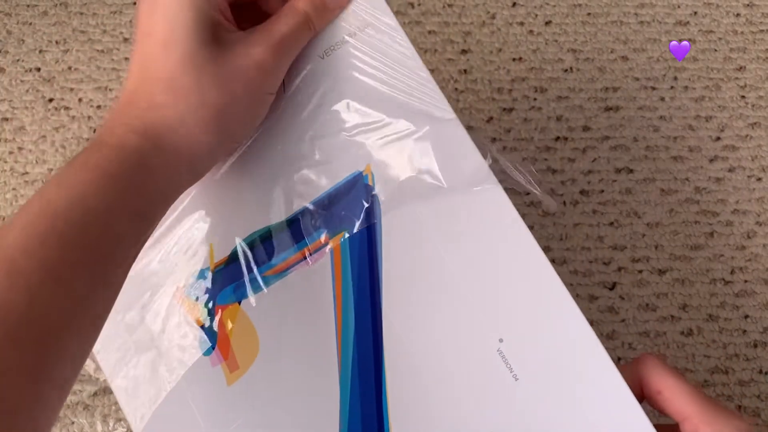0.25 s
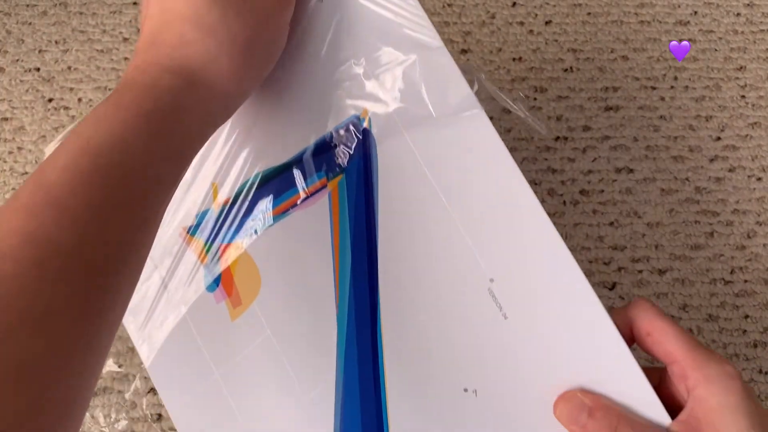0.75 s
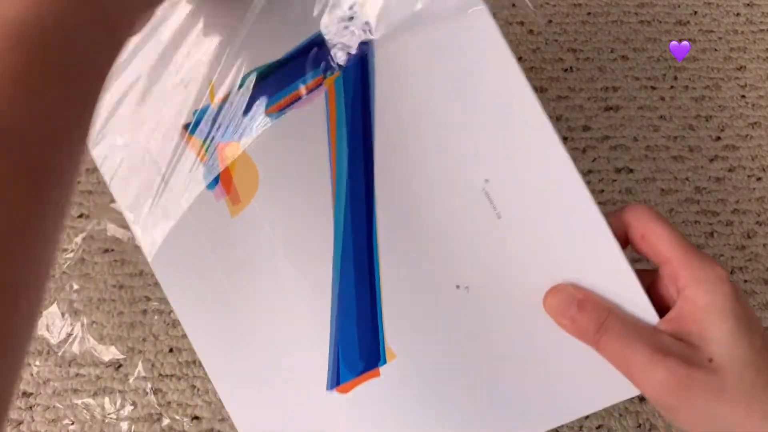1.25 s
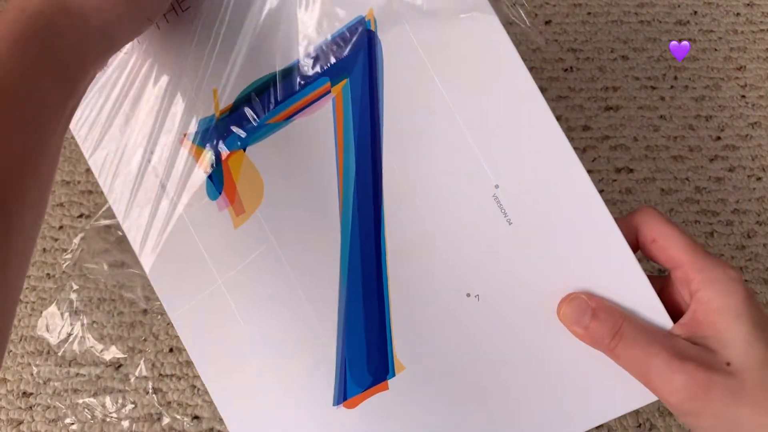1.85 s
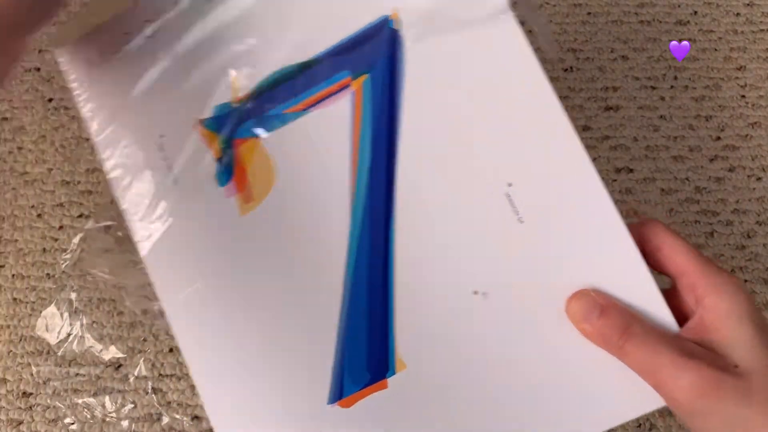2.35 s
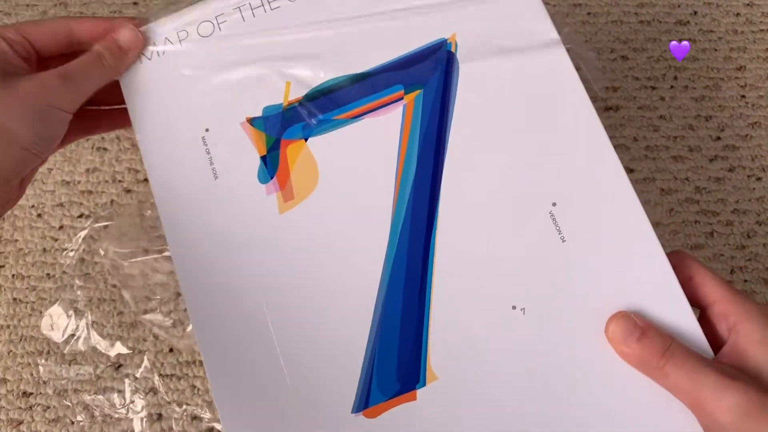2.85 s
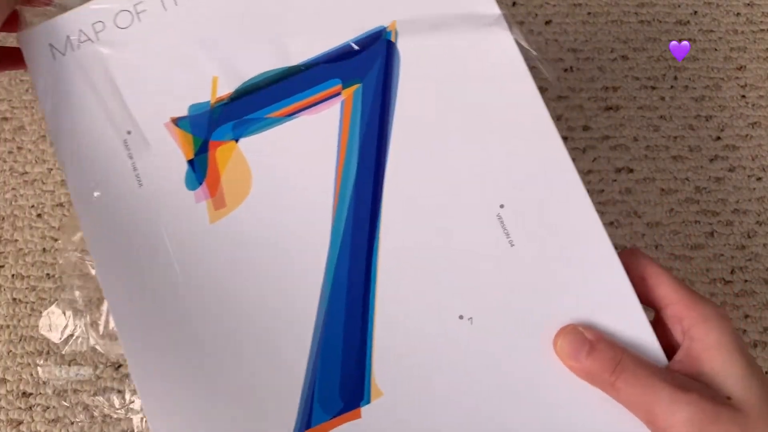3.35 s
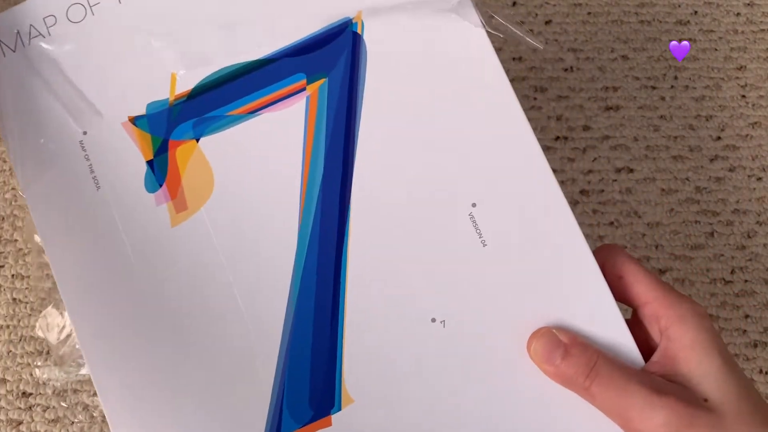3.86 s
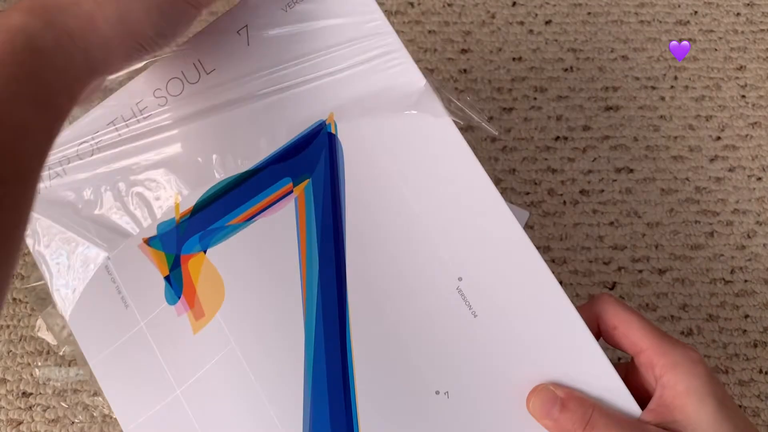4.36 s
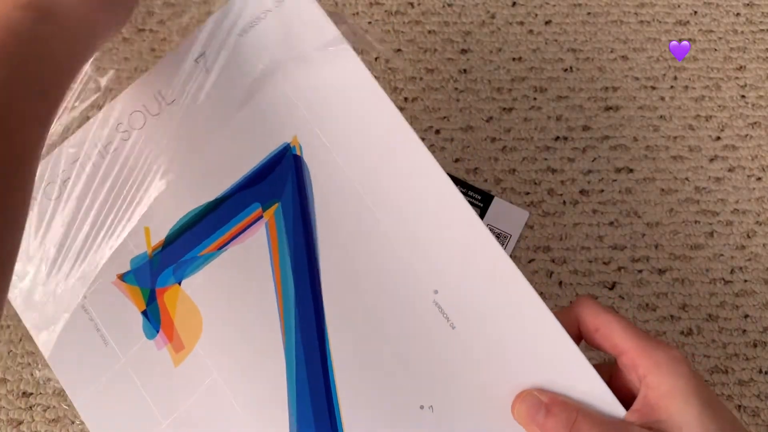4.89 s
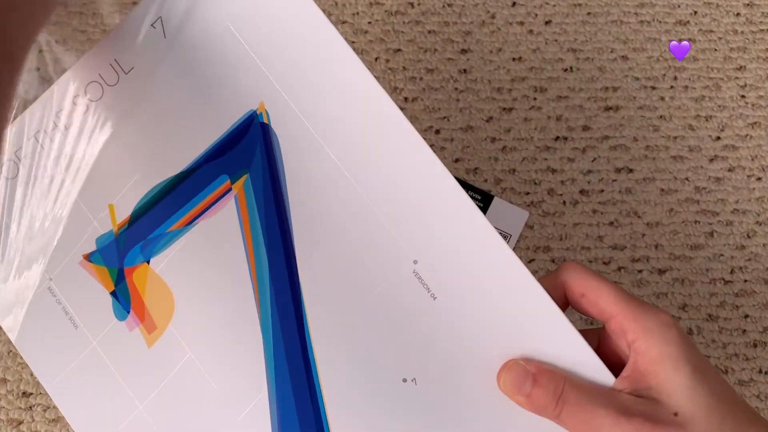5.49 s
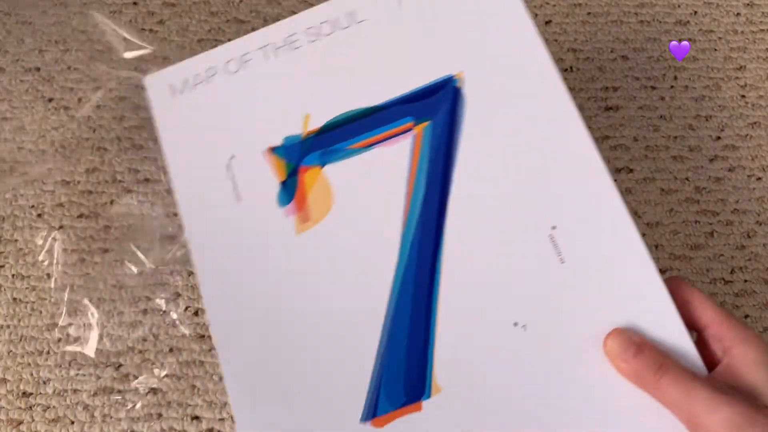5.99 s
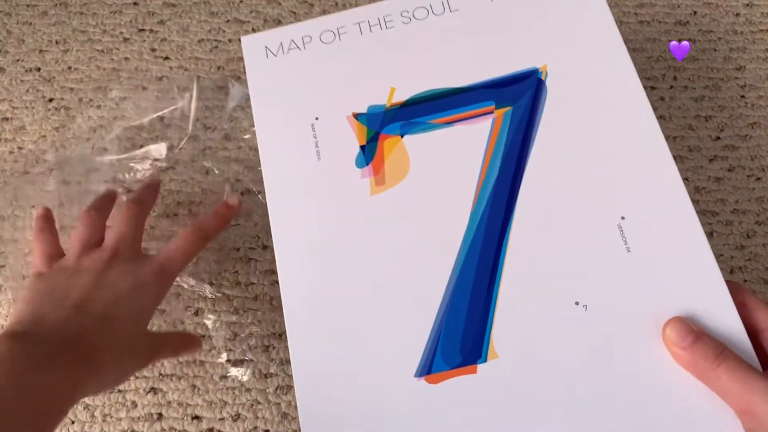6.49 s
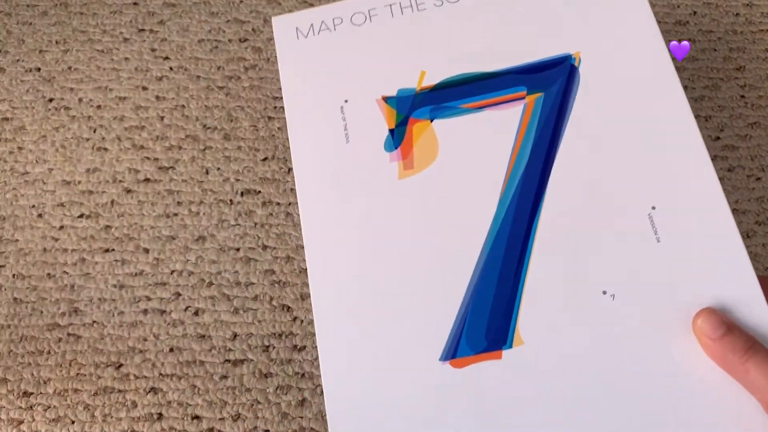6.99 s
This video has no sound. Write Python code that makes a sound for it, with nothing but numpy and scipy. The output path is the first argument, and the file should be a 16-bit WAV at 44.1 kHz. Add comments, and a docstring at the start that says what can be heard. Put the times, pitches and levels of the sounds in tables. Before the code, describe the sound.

Crisp crinkling of shrink wrap in uneven pulls, each with sharp clicks, sliding folds and small hollow box thuds, separated by near-quiet gaps. A strong snap with a short thump and ringing board marks the last corner coming free. Afterwards the loose plastic rustles more finely, one swelling shove sweeps it away, and a hand brushes low and soft over carpet. Close stereo microphone, short dry indoor reflections, faint room hush.

```python
"""Peeling shrink wrap off a box

Hands peel film off a cardboard box in a small carpeted room, close to a stereo microphone.
Creases snap and crackle as short ringing clicks; sliding film and tugs ring the damped modes of the hollow box.
The stretched film leaves the last corner with a loud pop: a crack, a thump, a ringing board and a flutter.
The loose film is then swept aside over the carpet with a swish of filtered noise; the quiet room lies under it all."""
import sys
import numpy as np
from scipy import signal
from scipy.fft import rfft, irfft, next_fast_len
from scipy.io import wavfile

SR = 44100
rng = np.random.default_rng(int(sys.argv[2]) if len(sys.argv) > 2 else 0)


def materialize(psi):
    """Save the field psi as 16-bit PCM at rate SR to the path in sys.argv[1].

    A 1-D psi becomes a single channel; in a 2-D psi each row is a channel.
    """
    bounded = np.clip(np.atleast_2d(psi).T, -1, 1)
    quanta = np.round(bounded * 32767).astype(np.int16)
    wavfile.write(sys.argv[1], SR, quanta)


N = 319128
TIME = np.arange(N) / SR

# The clearest creases that snap through, each with the flap of the film around it; levels before the trims in scene():
# (time [s], crack level [dB], crack pitch [Hz], flap level [dB], flap pitch [Hz])
SNAPS = [(0.016, -29, 8500, -57, 4400), (0.03, -34, 12000, -44, 4460), (0.053, -42, 8500, -58, 3030),
         (0.0615, -45, 8000, -63, 1410), (0.07, -34.5, 7900, -45.5, 4480), (0.08, -36, 9150, -57, 3630),
         (0.101, -40, 8140, -75, 4250), (0.108, -32, 8440, -36, 4670), (0.151, -34.5, 8600, -50.5, 2230),
         (0.154, -38, 8800, -52, 1500), (0.1736, -40, 8650, -51, 1100), (0.199, -48.5, 5200, -57, 4500),
         (0.239, -32.5, 8950, -36.5, 1400), (0.241, -36.5, 8060, -58, 1400), (0.27, -48, 5000, -44.5, 615),
         (0.2792, -33.5, 10000, -48, 1500), (0.321, -38.5, 12000, -52, 4300), (0.36, -38, 11600, -47, 1520),
         (0.363, -41, 8600, -51.5, 1480), (0.472, -58, 5170, -61.5, 3400),
         (0.5140, -39.5, 10300, -49.5, 2070), (0.522, -73, 7000, -53, 1220), (0.588, -55, 9200, -56, 4720),
         (0.637, -52, 6950, -54, 2400), (0.7319, -49, 8030, -42, 780), (0.7702, -59, 3900, -53, 2840),
         (0.782, -73, 4500, -54, 2330), (0.8459, -38.5, 9500, -79, 4000), (0.868, -39, 8750, -81, 4000),
         (0.905, -38, 8250, -51, 3180), (0.913, -55, 7800, -61, 1400), (0.9654, -29.5, 7360, -39, 2880),
         (0.979, -47, 9500, -44, 3320), (1.021, -51, 5400, -51.5, 800), (1.0253, -51, 8200, -57, 1160),
         (1.044, -48, 9000, -59, 4300), (1.057, -60, 10000, -56, 2020), (1.107, -51, 10500, -48, 1580),
         (1.131, -35.5, 10750, -53, 810), (1.1569, -40, 11900, -42, 1550),
         (1.1673, -30.5, 12500, -44, 1340), (1.1957, -33, 11180, -36.5, 4380),
         (1.206, -33, 10300, -53, 3700), (1.218, -44, 9960, -59, 3020), (1.2628, -36, 9900, -52.5, 1400),
         (1.2734, -56, 9100, -42, 794), (1.3088, -40, 5890, -47, 3860), (1.323, -55, 5000, -51, 4000),
         (1.391, -49, 6500, -63, 620), (1.413, -52, 6500, -60, 620), (1.4285, -35.5, 8780, -57, 3840),
         (1.434, -34, 8240, -57, 3500), (1.519, -49, 9300, -53, 1500), (1.544, -38, 12000, -40.5, 750),
         (1.547, -40, 8300, -50, 2100), (1.563, -50, 9600, -64, 1200), (1.641, -62, 5200, -54, 1200),
         (1.662, -45, 8150, -69, 2000), (1.721, -59, 9740, -66, 696), (1.757, -56, 9580, -60, 1180),
         (1.875, -68, 4600, -52.5, 2380), (2.009, -67, 10000, -78, 4100), (2.041, -56, 10600, -61, 1200),
         (2.1, -59, 9100, -56, 1360), (2.124, -51, 10400, -55, 1500), (2.1425, -49.5, 10700, -61, 3250),
         (2.194, -67, 8000, -47, 1226), (2.202, -45, 9800, -47, 1900), (2.2204, -39, 12000, -48, 1400),
         (2.238, -33, 12000, -45, 4330), (2.2407, -28, 10600, -45.5, 800), (2.2456, -32, 12400, -37.5, 785),
         (2.25, -41, 8900, -43, 2100), (2.273, -37.5, 11000, -48.5, 4300), (2.3027, -51, 9630, -58, 3390),
         (2.3925, -67, 4670, -66, 3730), (2.441, -73, 8970, -87.5, 4000), (2.472, -54, 12000, -84, 3620),
         (2.667, -66, 8000, -67.5, 3400), (2.719, -49, 12720, -62, 2020), (2.7323, -52, 10800, -72, 3800),
         (2.747, -57, 5470, -48.5, 700), (2.753, -42.5, 9400, -60, 3280), (2.774, -33.5, 13000, -70, 4310),
         (2.825, -33.5, 12000, -63, 3990), (2.845, -48, 10500, -61, 4000),
         (2.868, -37.5, 9500, -55.5, 3760), (2.8919, -32.5, 11600, -43, 1000), (2.9, -41, 8920, -43, 2100),
         (2.946, -46, 13200, -66, 3830), (2.964, -45, 10000, -57, 3800), (2.972, -42, 10000, -58, 4260),
         (2.977, -35, 10800, -46, 3800), (2.994, -39, 10000, -51, 3500), (3.0132, -51, 9600, -47, 1190),
         (3.02, -48, 10000, -50, 1400), (3.03, -46, 6660, -51, 3400), (3.0623, -52, 9960, -44, 780),
         (3.075, -48, 8900, -35.5, 1110), (3.1033, -29, 11400, -39.5, 2350),
         (3.106, -42, 11600, -34.5, 3640), (3.1111, -39, 9900, -41, 1240), (3.16, -44.5, 10570, -57, 2400),
         (3.1779, -38, 9700, -45, 910), (3.2116, -40, 9700, -52, 3980), (3.232, -64, 9400, -52, 1200),
         (3.248, -52, 10300, -68, 3500), (3.271, -69, 7500, -58, 1190), (3.2807, -50, 13300, -71, 1000),
         (3.406, -50, 10000, -51.5, 3220), (3.431, -66, 6130, -54, 1210), (3.468, -54.5, 7000, -54, 3400),
         (3.508, -44, 12000, -57, 3470), (3.59, -64, 4500, -46, 3370), (3.6798, -36, 9500, -45.5, 3780),
         (3.733, -47.5, 4240, -45, 1495), (3.749, -66, 5000, -53, 900), (3.9057, -31, 10000, -37.5, 2100),
         (3.96, -30.5, 10300, -37, 802), (4.0492, -42.5, 7420, -57, 2100), (4.189, -63, 11000, -76, 3360),
         (4.245, -75, 7800, -66, 2900), (4.326, -53, 9300, -56, 4500), (4.3306, -43.5, 11700, -50, 1930),
         (4.361, -36, 11000, -49, 1000), (4.389, -41.5, 6570, -47, 4300), (4.413, -41, 7540, -54, 900),
         (4.4214, -39.5, 10400, -57, 1200), (4.439, -46, 10600, -59, 4500), (4.46, -38.5, 12300, -46, 1420),
         (4.471, -47, 13500, -50, 1300), (4.524, -70, 5000, -54, 1200), (4.545, -64, 11900, -53, 1200),
         (4.569, -41, 8700, -48, 1090), (4.575, -45, 9400, -53, 2070), (4.605, -40, 12900, -52, 1100),
         (4.6152, -28, 12700, -31, 1000), (4.624, -35, 8580, -32.5, 780), (4.629, -32, 12400, -33, 1250),
         (4.653, -32.5, 12200, -40.5, 1000), (4.759, -36, 10400, -42.5, 1230), (4.779, -46, 5070, -53, 620),
         (4.782, -39.5, 12460, -51, 1198), (4.805, -47, 9700, -52, 4370), (4.826, -58, 13000, -54, 1000),
         (4.8527, -38, 10600, -49.5, 2790), (4.8614, -36, 12700, -49, 790), (4.873, -52.5, 7800, -52, 4370),
         (4.916, -48, 10430, -56, 800), (4.9369, -41, 9900, -61, 2100), (4.968, -51, 9360, -51, 1000),
         (5.129, -56, 8600, -71, 1190), (5.26, -49.5, 8520, -67, 1510), (5.388, -48, 8750, -57.5, 1414),
         (5.459, -41, 11400, -60, 4500), (5.472, -35.5, 9100, -73, 4400), (5.493, -31.5, 11300, -60, 3950),
         (5.525, -43, 6000, -41, 1210), (5.542, -35, 5500, -49, 3340), (5.588, -39, 13400, -46, 2200),
         (5.6747, -36.5, 6700, -33, 2800), (5.693, -37, 6100, -44, 3430), (5.74, -48, 6000, -46, 3340),
         (5.76, -33.5, 9000, -58, 3300), (5.782, -55, 5040, -51, 4180), (5.793, -40.5, 8500, -66, 4300),
         (5.832, -47, 9100, -53, 3400), (5.865, -38, 5240, -42.5, 3270), (5.934, -51, 5200, -53, 4600),
         (6, -43, 8280, -53.5, 3320), (6.0468, -45, 6200, -74.5, 4020), (6.085, -46, 13400, -66, 4500),
         (6.105, -45, 6300, -49, 2320), (6.113, -38.5, 9600, -47, 2190), (6.119, -37, 12000, -47.5, 2320),
         (6.138, -55, 10000, -55, 3470), (6.158, -33.5, 11000, -41, 2370), (6.188, -33.5, 9600, -40, 3630),
         (6.196, -35, 9300, -52, 4400), (6.319, -50.5, 5920, -47, 1400), (6.329, -50, 5000, -46.5, 4050),
         (6.41, -54, 6000, -50.5, 3320), (6.429, -47, 10900, -49, 3600), (6.449, -41.5, 10700, -76, 3980),
         (6.5197, -43.5, 7200, -62, 3380), (6.5257, -52.5, 6000, -45.5, 3330),
         (6.574, -37.5, 9410, -52, 3400), (6.586, -35, 9400, -51, 3600), (6.615, -40.5, 4990, -36, 4180),
         (6.723, -38, 10000, -43, 4300), (6.734, -34, 12550, -49, 3800), (6.795, -41, 6800, -51, 4090),
         (6.912, -39, 10400, -63, 3734), (6.959, -44, 5900, -47, 3030), (7.161, -54, 9600, -56, 3280),
         (7.2087, -43, 13000, -56, 3970)]


def from_db(db):
    """Turn decibels into gain."""
    return 10 ** (np.asarray(db) / 20)


def rms_one(x):
    """Scale to an rms of 1."""
    return x / np.sqrt(np.mean(x ** 2) + 1e-20)


def energy_one(x):
    """Scale to a total energy of 1."""
    return x / np.sqrt(np.sum(x ** 2) + 1e-20)


def at_level(sound, db):
    """Give a short sound the energy of 2 ms at this level."""
    return energy_one(sound) * from_db(db) * np.sqrt(SR / 500)


def over_time(points):
    """Draw straight lines through (time, value) points."""
    return np.interp(TIME, *np.transpose(points))


def at_hz(points, hz):
    """Read a spectrum on a logarithmic frequency axis."""
    f, value = np.transpose(points)
    return np.interp(np.log(np.maximum(hz, 1)), np.log(f), value)


def drift(rate):
    """Wander at random with a spread of about 1, heading for a new value `rate` times a second."""
    return np.interp(TIME * rate, np.arange(8000), rng.standard_normal(8000))


def colour(x, spectrum):
    """Filter with the given spectrum; minimum phase keeps the sound from starting early."""
    size = 4096
    gain = from_db(at_hz(spectrum, np.fft.rfftfreq(size, 1 / SR)))
    cepstrum = irfft(np.log(gain))
    cepstrum[1:size // 2] *= 2
    cepstrum[size // 2 + 1:] = 0
    response = irfft(np.exp(rfft(cepstrum)))
    return signal.oaconvolve(x, response)[:len(x)]


def highpass(x, order, hz):
    """Remove the notes below a pitch."""
    return signal.sosfilt(signal.butter(order, hz, "high", fs=SR, output="sos"), x)


def resonance(x, hz, width_hz):
    """Ring at one pitch with a two-pole filter whose gain is 1 on top."""
    r = np.exp(-np.pi * width_hz / SR)
    w = 2 * np.pi * min(hz, SR / 2) / SR
    # the tiny offset keeps the filter from slowing down in silence
    return signal.lfilter(np.array([1, 0, -1]) * (1 - r * r) / 2, [1, -2 * r * np.cos(w), r * r], x + 1e-18)


def add(out, s, sound):
    """Mix a short sound in at time s."""
    i = max(round(s * SR), 0)
    out[..., i:i + sound.shape[-1]] += sound[..., :max(N - i, 0)]


def panned(sound, left_db):
    """Make the left channel louder than the right by left_db."""
    return sound * from_db(np.array([[left_db], [-left_db]]) / 2)


def click(spread_s, size=1024):
    """Film is dispersive: every pitch of a click leaves it after a short delay of its own."""
    bins = np.arange(size // 2 + 1)
    delay = spread_s * np.interp(bins / 20, np.arange(size), rng.random(size) ** 2) + 12 / SR
    # adding up the delays over frequency gives the phase
    return irfft(np.exp(-2j * np.pi * np.cumsum(delay) * SR / size))


def burst(decay_s, size=1024):
    """A quick avalanche of tiny slips is noise that swells at once and dies away."""
    age = TIME[:size] / decay_s
    return rng.standard_normal(size) * age * np.exp(-age)


def slips(per_s, spread_db, clump_db):
    """Stick-slip gives random clicks, many small and few large, in quick and slow clumps; rms 1 overall."""
    sizes = from_db(spread_db * np.minimum(rng.exponential(1, N), 4)) * rng.choice([-1, 1], N)
    born = rng.random(N) < per_s / SR
    clumps = from_db(clump_db * (drift(260) + .6 * drift(80)))
    # a changing rate is evened out, so that more clicks are not also louder
    return rms_one(born * sizes * clumps / np.sqrt(per_s))


def grains(clicks, pitches, ring_q):
    """Each click rings briefly at one of several pitches, dealt at random."""
    dealt = rng.integers(0, len(pitches), N)
    return sum(resonance(clicks * (dealt == k), hz, hz / ring_q) / np.sqrt(hz) for k, hz in enumerate(pitches))


def loose_share():
    """The wrap comes free of the box and lies loose: 0 is on the box, 1 is loose."""
    # (time [s], loose share [0 to 1])
    freed = [(5.6, 0), (6.0, 1)]
    return over_time(freed)


def quiet_room():
    """The quiet background is coloured noise that wavers a little, partly different in the two channels."""
    # spectrum of the background: (frequency [Hz], level [dB])
    tone_spectrum = [(20, -5), (40, 5), (55, 16), (85, 14), (160, 6), (400, -3.5), (1000, -13), (2200, -11),
                     (4500, -15.5), (8000, -20), (14000, -21)]
    shared_level_db, waver_db = -76, 2
    shared, differing = [rms_one(colour(rng.standard_normal(N), tone_spectrum)) for _ in range(2)]
    air = shared + 0.45 * differing * np.array([[1], [-1]])
    return from_db(shared_level_db + waver_db * drift(6.2)) * air


def brushed_carpet():
    """The hand brushes the carpet: low, coloured noise follows its strokes."""
    # strokes: (time [s], level [dB])
    strokes = [(5.45, -105), (5.7, -71.5), (6.15, -76), (6.45, -74.5), (6.65, -63.5), (6.9, -68),
               (7.05, -63.5), (7.24, -79)]
    # spectrum of the brushing: (frequency [Hz], level [dB])
    carpet_spectrum = [(30, -28), (60, 10.5), (90, 6), (170, 2), (300, -13), (800, -27), (4000, -38)]
    return from_db(over_time(strokes)) * rms_one(colour(rng.standard_normal(N), carpet_spectrum))


def room(x, low_cut_hz, apart, build_s):
    """Dense, thin reflections from one spot; the two ports differ most in the middle treble."""
    t60_s = 0.11
    late_db, late_t60_s = -21, 0.26  # a faint, slower tail from the far walls
    t = TIME[:SR // 2]
    decay = from_db(-60 * t / t60_s) + from_db(late_db - 60 * t / late_t60_s)
    decay = decay * (1 - np.exp(-t / build_s))
    shared, own = [energy_one(rng.standard_normal(len(t)) * decay) for _ in range(2)]
    differing = resonance(own, 3420, 5000) + 0.69 * own
    paths = highpass(shared + apart * differing * np.array([[1], [-1]]), 1, low_cut_hz)
    mono = np.atleast_2d(x).mean(0)[None]
    return signal.oaconvolve(mono, paths, axes=1)[:, :N]


def pulled(start, hold_s, grip_db_per_s, relax_db_per_s):
    """One pull in dB: it takes hold, stays and lets go."""
    before, after = np.maximum(start - TIME, 0), np.maximum(TIME - start - hold_s, 0)
    return -grip_db_per_s * before - relax_db_per_s * after


def hands():
    """Crinkling, sliding and rubbing in dB: pulls and a last shove stand out of the strain left in the film."""
    # strain left between pulls, as faint crinkling: (time [s], level [dB])
    strain = [(0, -51.5), (0.33, -66), (0.47, -72), (0.82, -73.5), (1.15, -59), (1.68, -59), (2.05, -79),
              (2.3, -77), (2.42, -102), (2.69, -78), (2.76, -49.5), (3.3, -63), (3.6, -66), (3.98, -61.5),
              (4.12, -109), (4.29, -101), (4.35, -60.5), (4.85, -59), (5.09, -68.5), (5.17, -65),
              (5.34, -62.5), (5.5, -54), (5.97, -60), (6.12, -51), (6.39, -62), (6.48, -59.5), (6.6, -60)]
    # one swelling stroke shoves the loose film aside:
    # (time [s], crinkling level [dB], sliding level [dB], rubbing level [dB])
    shove_stroke = [(6.498, -67, -67, -75), (6.563, -43, -56, -51.5), (6.62, -37, -49.5, -50.5),
                    (6.68, -40.5, -50, -52), (6.755, -49.5, -60.5, -61.5), (6.87, -49.5, -56, -62.5),
                    (6.929, -47.5, -57, -55), (7.03, -58, -59, -69.5), (7.24, -62, -67.5, -79.5)]
    # pulls on the film and, once it is off, shoves: (start [s], hold [s], crinkling of small creases [dB],
    # sliding of broad folds [dB], rubbing on box or carpet [dB])
    pulls = [(0.053, 0.14, -55.5, -62.5, -69.5), (0.24, 0.019, -48.5, -52.5, -63),
             (0.738, 0.0083, -70, -63, -75), (0.971, 0.006, -49.5, -57.5, -65),
             (1.191, 0.11, -49.5, -52.5, -57), (1.318, 0.068, -54.5, -57, -61.5),
             (1.417, 0.096, -54.5, -55.5, -61.5), (1.512, 0.079, -49.5, -58, -55.5),
             (1.594, 0.069, -59.5, -74, -60), (1.874, 0.028, -60.5, -61.5, -68.5),
             (2.185, 0.027, -51.5, -57, -78), (2.228, 0.015, -43.5, -59, -52.5),
             (2.748, 0.022, -56, -59, -57.5), (2.815, 0.053, -55, -65, -65), (2.887, 0.01, -45, -56, -55.5),
             (3.003, 0.021, -42, -53, -50.5), (3.062, 0.078, -47.5, -52.5, -57.5),
             (3.144, 0.068, -67, -62, -73), (3.382, 0.042, -64, -60.5, -81),
             (3.902, 0.031, -43, -48.5, -51.5), (4.348, 0.16, -54, -61, -59),
             (4.611, 0.043, -44.5, -50, -47.5), (4.65, 0.058, -50, -64, -57),
             (4.725, 0.018, -44, -51, -48.5), (5.495, .02, -44.5, -54.5, -61),
             (5.53, 0.085, -49.5, -55.5, -59), (5.659, 0.11, -49, -64.5, -59),
             (5.809, 0.097, -55.5, -58, -65.5), (6.144, 0.072, -44.5, -61.5, -56.5),
             (6.251, 0.075, -49.5, -60, -62.5), (6.437, 0.014, -55.5, -69, -62.5)]
    # under strain the folds and the box murmur along, relative to the crinkling
    strain_slide_db, strain_rub_db = -8.5, -14.5
    # a pull takes hold quickly and the film relaxes more slowly
    grip_db_per_s, relax_db_per_s = 495, 263
    # the box is rubbed only while the hand moves
    rub_grip_db_per_s, rub_relax_db_per_s = 731, 305

    strain_db = over_time(strain)
    s, *shove_levels = np.transpose(shove_stroke)
    offsets = (0, strain_slide_db, strain_rub_db)
    crinkle_db, slide_db, rub_db = [np.maximum(strain_db + offset, np.interp(TIME, s, level, left=-np.inf))
                                    for offset, level in zip(offsets, shove_levels)]
    for start, hold_s, creases, broad_folds, rubbing in pulls:
        film = pulled(start, hold_s, grip_db_per_s, relax_db_per_s)
        rub = pulled(start, hold_s, rub_grip_db_per_s, rub_relax_db_per_s)
        crinkle_db = np.maximum(crinkle_db, creases + film)
        slide_db = np.maximum(slide_db, broad_folds + film)
        rub_db = np.maximum(rub_db, rubbing + rub)
    return crinkle_db, slide_db, rub_db


def box(force):
    """The hollow cardboard box rings in its damped modes, a little differently for each place and grip."""
    # modes before the random shifts: (pitch [Hz], level [dB], time to fall by 60 dB [s])
    box_modes = [(80.5, -32, 0.19), (163, -16.5, 0.035), (192, -8.5, 0.026), (251, -1.5, 0.019),
                 (296, -2.5, 0.028), (366, 1, 0.018), (461, 0, 0.016), (584, -3.5, 0.021),
                 (738, -2.5, 0.011), (853, -6.5, 0.021), (1000, -4.5, 0.0071), (1267, -3.5, 0.012),
                 (1640, -9, 0.0064), (2100, -8.5, 0.0095)]
    place_spread_db, grip_detune = 1.5, .04  # each place favours other modes; the grip shifts their pitch
    out = 0
    for k, (hz, db, t60) in enumerate(box_modes):
        place, grip = rng.standard_normal(2)
        r = from_db(-60 / (t60 * SR))
        w = 2 * np.pi * hz * (1 + grip_detune * grip) / SR
        mode = signal.lfilter([0, np.sin(w)], [1, -2 * r * np.cos(w), r * r], force + 1e-18)
        out = out + (-1) ** k * from_db(db + place_spread_db * place) * mode
    return out


def blow(contact_s, grit, size=6000):
    """One push on the box, made gritty by the film that slips under it."""
    age = TIME[:size] / contact_s
    push = energy_one(age * np.exp(-age))
    return box(push + grit * energy_one(burst(0.00068, size=size)))


def handling(rub_db, knock_db, count=4):
    """Film and fingers judder over places on the box and tug at it; loose film swishes over the carpet."""
    # tugs and bumps on the box, levels before knock_db is added; a longer contact sounds duller:
    # (time [s], level [dB], contact time [s])
    knocks = [(0.109, -48.5, 0.00013), (0.152, -58, 0.000064), (0.184, -55, 0.00028),
              (0.247, -42.5, 0.00018), (0.26, -53, 0.000073), (0.268, -48.5, 0.00017),
              (0.731, -73, 0.00013), (0.966, -48.5, 0.000032), (0.977, -64, 0.00017),
              (1.197, -38.5, 0.00034), (1.215, -65, 0.00036), (1.261, -42.5, 0.00019),
              (1.272, -44.5, 0.00044), (1.341, -47, 0.00066), (1.373, -54, 0.0016), (1.531, -46.5, 0.0002),
              (1.567, -55, 0.00041), (1.604, -52, 0.0004), (1.716, -60.5, 0.000086),
              (1.871, -56.5, 0.00018), (2.194, -54, 0.000077), (2.246, -38, 0.00042), (2.618, -63, 0.00017),
              (2.748, -58, 0.00025), (2.893, -45, 0.00048), (3.006, -53, 0.00084), (3.023, -48, 0.00011),
              (3.061, -45.5, 0.000062), (3.072, -49, .0001), (3.105, -42.5, 0.000041),
              (3.178, -48.5, 0.000069), (3.28, -66.5, 0.00015), (3.742, -65, 0.00012), (3.904, -53, 0.0007),
              (3.921, -47, 0.0003), (3.958, -46.5, 0.00037), (4.366, -51.5, 0.00062),
              (4.468, -53.5, 0.00033), (4.625, -39.5, 0.00007), (4.651, -56, 0.0001), (4.728, -54, 0.00045),
              (4.743, -38, 0.00059), (4.778, -53.5, 0.000092), (4.928, -59.5, 0.00084),
              (5.517, -38, 0.00093), (5.53, -44, .0003)]
    # spectrum of the loose film dragged over the carpet: (frequency [Hz], level [dB per Hz])
    swish_spectrum = [(60, -22), (150, -1.5), (300, 1.5), (600, -6), (1000, -2.5), (2000, -6.5),
                      (3500, -3.5), (7000, -13.5)]
    on_box = 1 - loose_share()
    judder = rms_one(sum(box(slips(220, spread_db=0.5, clump_db=6.0)) for _ in range(count)))
    swish = rms_one(colour(slips(3000, spread_db=2.0, clump_db=0.0), swish_spectrum))
    out = from_db(rub_db) * (np.sqrt(on_box) * judder + np.sqrt(1 - on_box) * swish)
    for s, db, contact_s in knocks:
        add(out, s + 0.0011, at_level(blow(contact_s, grit=0.43), db + knock_db))
    return highpass(out, 2, 62)  # the box is too small to radiate deep bass


def folds(level_db, spread_db, per_s, ring_q):
    """Broad folds drag over the board in dull clicks, which even out once the film lies loose."""
    # spectrum of the dragging folds: (frequency [Hz], level [dB per Hz])
    fold_spectrum = [(300, 4.5), (700, -6.5), (1200, -5.5), (2000, 6.5), (2700, 2.5), (3400, 2),
                     (4500, 1.5), (8000, -26)]
    loose = loose_share()
    rate = per_s * from_db(.25 * (level_db + 72.5))  # louder sliding has more clicks
    clicks = slips(rate, spread_db, clump_db=4.5 - 1.5 * loose) * from_db(2 * loose)
    rings = grains(clicks, np.linspace(600, 5000, num=12), ring_q)
    return from_db(level_db) * rms_one(colour(rings, fold_spectrum))


def crinkle(level_db, per_s, ring_q):
    """Small creases flip, more and more unevenly the harder the film is worked; loose film rustles finely."""
    # spectrum of the crinkling: (frequency [Hz], level [dB per Hz])
    crinkle_spectrum = [(1500, -38), (3000, 2.5), (4300, 4), (6500, 7), (8600, 9), (10500, 11), (13300, 13),
                        (15500, -5.5)]
    effort = np.clip((level_db + 75) / 25, 0, 1)
    loose = loose_share()
    rate = per_s * (1 + effort) * (1 + 1.5 * loose)
    clicks = slips(rate, spread_db=2.5 + 2 * effort, clump_db=2.5 - 1.2 * loose)
    evened = clicks * from_db(-4.5 * effort)  # offsets the larger clicks of hard work
    rings = grains(evened, np.geomspace(3000, 15000, num=12), ring_q)
    return from_db(level_db) * rms_one(colour(rings, crinkle_spectrum))


def small_snaps(crinkle_db, count=700):
    """Any of many small creases may give way, depending on the effort at that moment; rows as in SNAPS."""
    # rate and levels at the effort worked_db; they follow the effort by these shares
    worked_db = -55
    snaps_per_s, rate_follows = 24, 0.58
    base_crack_db, base_flap_db, level_follows, spread_db = -52.5, -66.5, 0.85, 2
    crack_range_hz, flap_range_hz = (7950, 12000), (880, 4600)

    when, chance, crack_pitch, flap_pitch = rng.random((count, 4)).T
    crack_size, flap_size = spread_db * rng.standard_normal((count, 2)).T
    effort_db = crinkle_db[(when * (N - 1)).astype(int)] - worked_db
    rows = np.transpose([when * N / SR,
                         base_crack_db + level_follows * effort_db + crack_size,
                         np.interp(crack_pitch, [0, 1], crack_range_hz),
                         base_flap_db + level_follows * effort_db + flap_size,
                         np.interp(flap_pitch, [0, 1], flap_range_hz)])
    expected = snaps_per_s * from_db(rate_follows * effort_db) * N / SR
    return rows[chance < expected / count]


def after_snaps():
    """A clear snap often tips over a neighbouring crease, a moment later and weaker; rows as in SNAPS."""
    share, loss_db, delay_range_s = .45, 7, (.002, 0.0097)
    s, crack_db, crack_hz, flap_db, flap_hz = np.transpose(SNAPS)
    chance, delay = rng.random((len(s), 2)).T
    later = s + np.interp(delay, [0, 1], delay_range_s)
    rows = np.transpose([later, crack_db - loss_db, crack_hz, flap_db - loss_db, flap_hz])
    return rows[chance < share]


def snaps(creases, crack_db, flap_db, flap_s, crack_width_hz, flap_width_hz, ragged, ragged_s, thin_share,
          board_ring):
    """A crease buckles with a ragged, bright crack about a millisecond long; the loose film flaps lower."""
    pan_db, pan_spread_db = 1, 6.5  # all come from about the same place: left minus right
    crack_s = .0013
    out = np.zeros((2, N))
    for s, crack_level, crack_hz, flap_level, flap_hz in creases:
        slip = click(crack_s) + ragged * energy_one(burst(ragged_s))
        # a small crease radiates no low notes
        low_cut_hz = np.clip(thin_share * crack_hz, 2500, 5500)
        crack = highpass(resonance(slip, crack_hz, crack_width_hz), 3, low_cut_hz)
        slap = click(flap_s)
        flap = resonance(slap, flap_hz, flap_width_hz) + 0.25 * resonance(slap, 1560, 1700)
        flap += 0.033 * resonance(slap, 2.1 * flap_hz, flap_hz)  # its broad overtone
        flap += board_ring * resonance(slap, 3310, 87)  # the board's strongest mode answers
        sound = at_level(crack, crack_level + crack_db) + at_level(flap, flap_level + flap_db)
        add(out, s - crack_s / 4, panned(sound, pan_db + pan_spread_db * rng.standard_normal()))
    return out


def pop(crack_s, thump_hz, thump_width_hz, flutter_t60_s, pan_db):
    """Taut film whips off the corner and flutters; the lid springs back in a few swings, the board rings on."""
    # the film lets go of the corner: (time [s], crack level [dB], thump level [dB],
    # ring of the stiff board [dB], flutter of the slack film [dB])
    releases = [(5.5147, -17, -22, -31.5, -27)]
    # spectrum of the crack: (frequency [Hz], level [dB])
    crack_spectrum = [(30, -60.5), (70, -6), (150, -28), (400, -7), (1200, 1.5), (1700, 4.5), (2300, 0.5),
                      (3300, 2), (4000, -5), (5000, -1), (7000, -9.5), (10500, -6), (15500, -8.5)]
    # the stiff board, set ringing by a hard blow: (pitch [Hz], level [dB], time to fall by 60 dB [s])
    board_modes = [(379, -3, .15), (809, -3, .09), (1210, 0, .09), (1659, -4, .1), (1795, -4, .08),
                   (2346, -6, .16), (2589, -6, .16), (3344, 2, .1), (4238, -8, .16), (4778, -6, .13),
                   (4975, -6, .14), (5313, -7, .15)]
    # spectrum of the flutter: (frequency [Hz], level [dB])
    flutter_spectrum = [(200, -2), (450, 6), (1000, -12), (2000, -2), (5000, 2), (8000, -2.5),
                        (13000, -1.5), (16000, -12)]

    out, age = np.zeros((2, N)), TIME[:SR // 3]
    impulse = 1. * (age == 0)
    thump = resonance(resonance(impulse, thump_hz, thump_width_hz), thump_hz, 350)
    ring = sum((-1) ** k * np.sin(2 * np.pi * hz * age) * from_db(db - 60 * age / t60)
               for k, (hz, db, t60) in enumerate(board_modes))
    flaps = slips(2600, spread_db=0.5, clump_db=1.0)[:len(age)]
    flutter = colour(flaps * from_db(-60 * age / flutter_t60_s), flutter_spectrum)
    for s, crack_db, thump_db, ring_db, flutter_db in releases:
        crack = at_level(colour(click(crack_s), crack_spectrum), crack_db)
        add(out, s, panned(crack, pan_db))
        answer = at_level(thump, thump_db) + at_level(ring, ring_db) + at_level(flutter, flutter_db)
        add(out, s + 0.000915, answer)
    return out


def scene():
    """Film and box, their reflections, the brushed carpet and the quiet room."""
    crinkle_db, slide_db, rub_db = hands()
    creases = [*SNAPS, *after_snaps(), *small_snaps(crinkle_db)]
    sources = [handling(rub_db - 0.5, knock_db=3.5),
               folds(slide_db - 4.0, spread_db=2.5, per_s=750, ring_q=1.74),
               crinkle(crinkle_db - 5.5, per_s=2300, ring_q=1.94),
               snaps(creases, crack_db=-6.5, flap_db=-4.5, flap_s=0.001532, crack_width_hz=3900,
                     flap_width_hz=430, ragged=2.6, ragged_s=0.00045, thin_share=0.56, board_ring=0.36),
               pop(crack_s=0.00174, thump_hz=368, thump_width_hz=220, flutter_t60_s=0.22, pan_db=4.5)]
    # the hands move about, so the pattern of reflections keeps changing between two spots
    spot = drift(5)
    echoes = sum(room(x * share, low_cut_hz=290, apart=1.0, build_s=0.00023)
                 for x in sources for share in (np.cos(spot), np.sin(spot)))
    return quiet_room() + brushed_carpet() + from_db(-7) * echoes + sum(sources)


def record(dry):
    """The two microphone ports differ in phase and level with frequency; the top is cut."""
    # how far the left port leads: (frequency [Hz], phase [radians])
    port_phase = [(20, 0), (500, .1), (1120, .6), (1640, 2.1), (2300, 3.1), (4200, 6), (6500, 7), (8000, 8),
                  (10000, 6.3), (11800, 3.1), (13000, .3), (14000, -1), (15000, -3), (16400, -3.8)]
    # left minus right: (frequency [Hz], level [dB])
    port_balance = [(150, 1), (350, 0), (700, 5), (1500, 1.5), (3000, 0), (5000, -1), (7000, -1),
                    (8600, -7.5), (10500, 0), (15000, -1)]
    cutoff_hz = 16000
    size = next_fast_len(N + 4096)
    hz = np.fft.rfftfreq(size, 1 / SR)
    # each port takes half of the difference
    half = from_db(at_hz(port_balance, hz) / 2) * np.exp(.5j * at_hz(port_phase, hz))
    heard = irfft(rfft(dry, size) * np.array([half, 1 / half]), size)[:, :N]
    return signal.sosfilt(signal.ellip(10, .1, 80, cutoff_hz, fs=SR, output="sos"), heard)


dry = scene()
out = record(dry)
materialize(out)
```